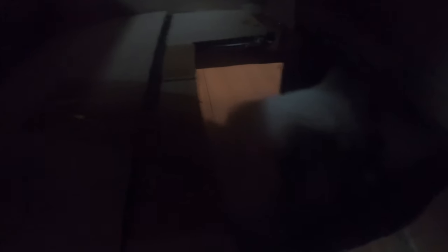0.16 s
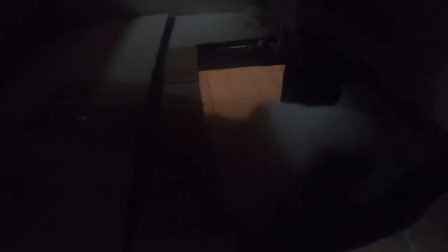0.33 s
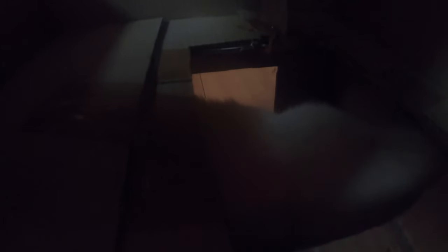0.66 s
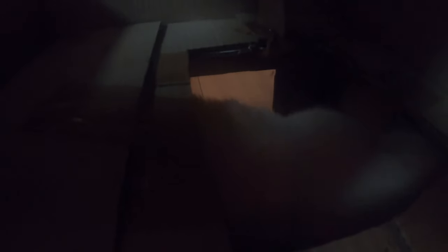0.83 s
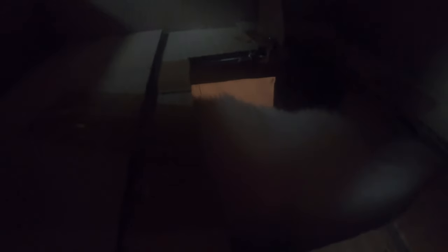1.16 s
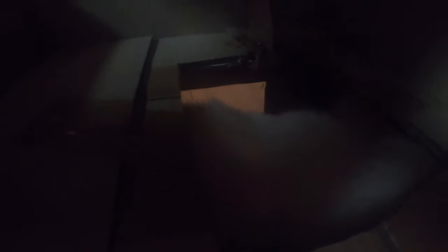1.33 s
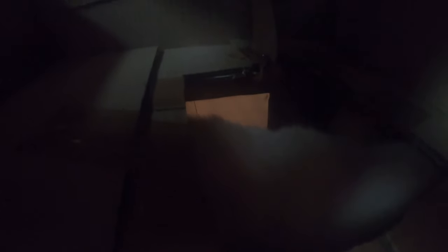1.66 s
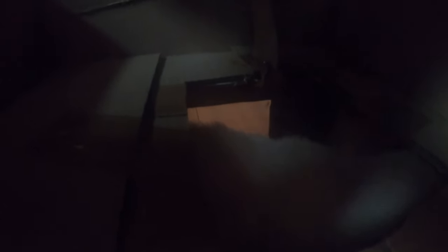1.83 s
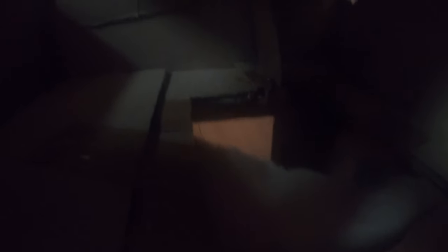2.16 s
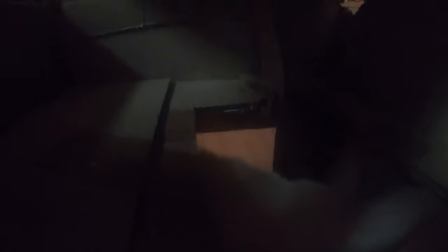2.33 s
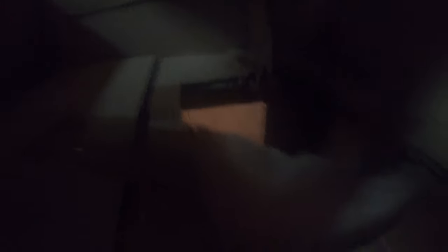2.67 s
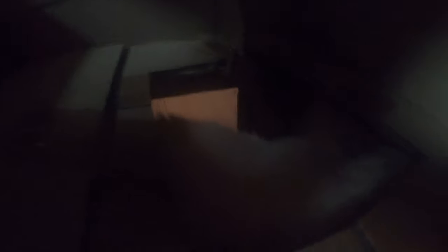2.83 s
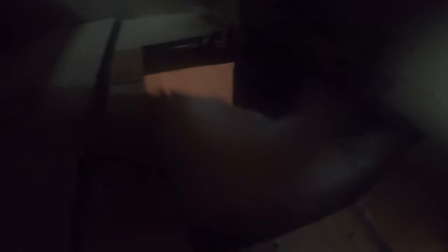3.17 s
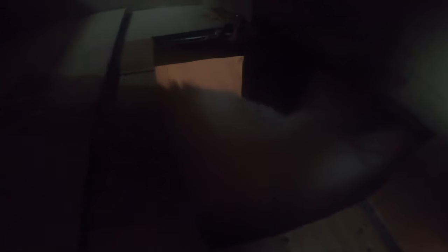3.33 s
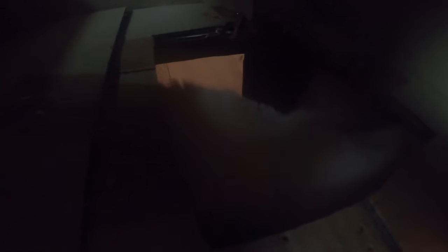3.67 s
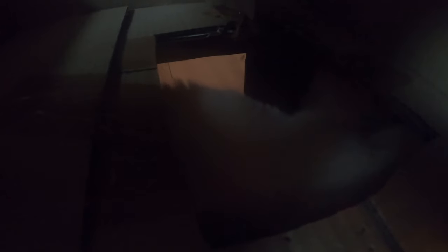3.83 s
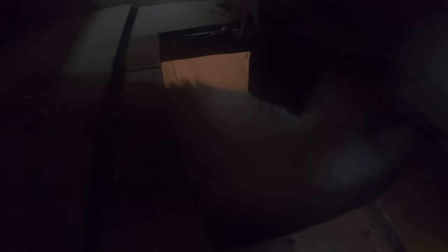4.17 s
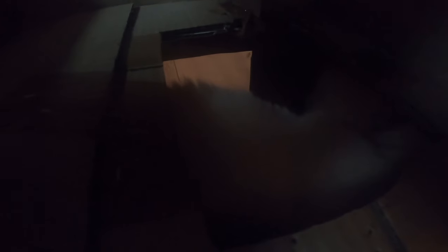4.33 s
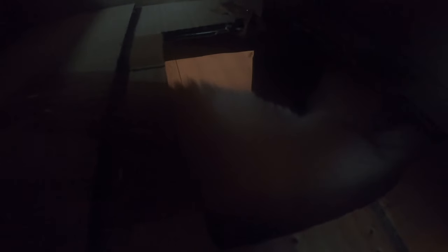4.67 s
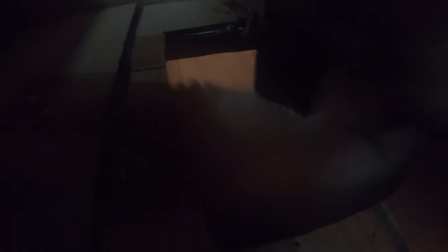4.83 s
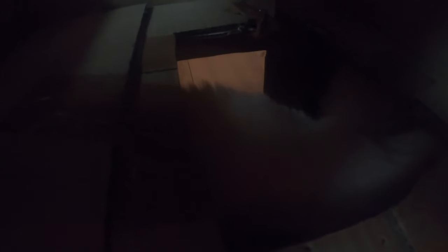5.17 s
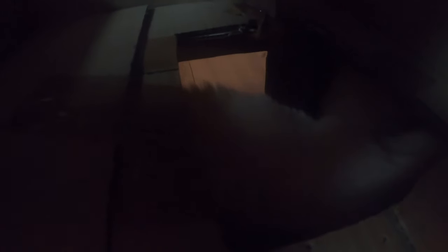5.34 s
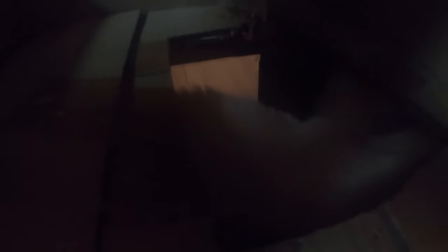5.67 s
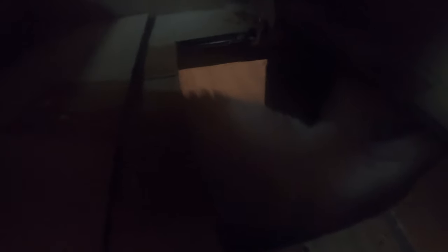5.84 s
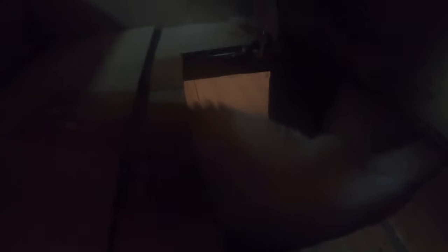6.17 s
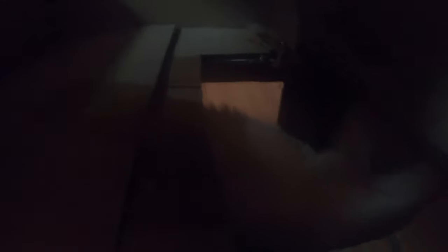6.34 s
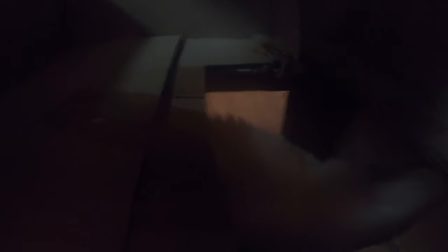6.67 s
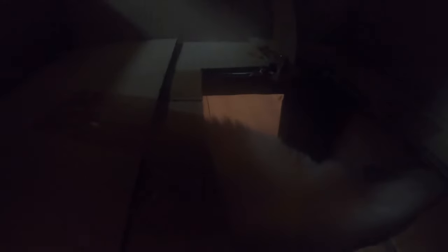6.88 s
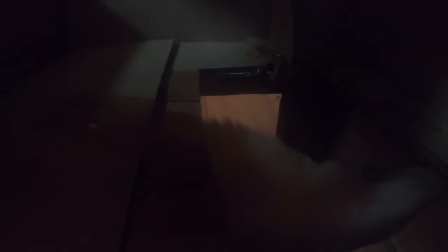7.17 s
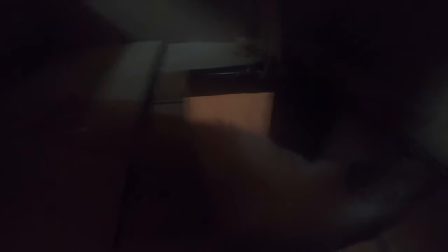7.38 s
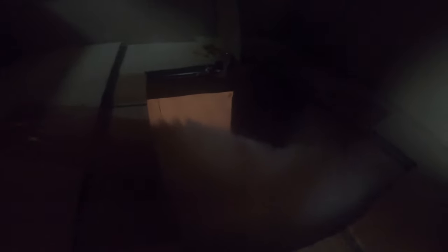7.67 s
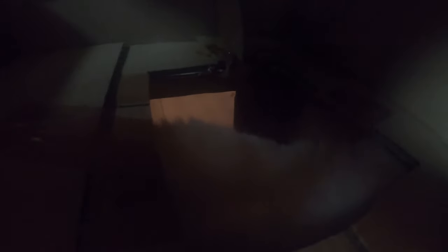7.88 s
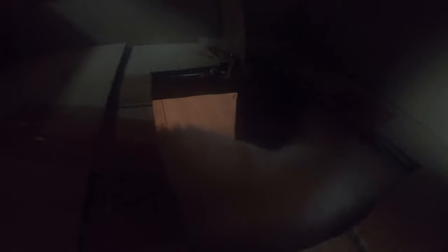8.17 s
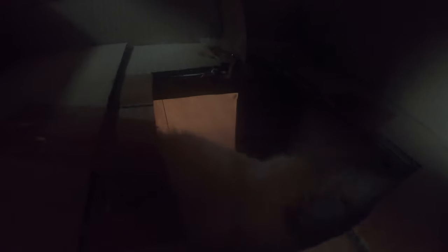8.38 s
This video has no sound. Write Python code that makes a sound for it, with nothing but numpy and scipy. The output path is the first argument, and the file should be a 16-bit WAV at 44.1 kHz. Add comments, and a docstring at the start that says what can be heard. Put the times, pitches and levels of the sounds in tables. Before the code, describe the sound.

A close stereo perspective on a cat shifting in a hollow cardboard box, in a quiet room with faint low background noise and very short echoes. A sharp claw tick at 0.15 s opens a run of brief paw scrapes, strongest around 0.4-0.7 s with a soft low bump. A dry flap-edge click comes near 1 s, then lighter scrapes and pad taps to 1.5 s. Sparse scratching follows, busier at 2.6-3.4 s, with gentle taps until 4.4 s. A stronger hollow scrape and low thud arrive at 4.7-5 s. From 5.3 s fur brushes the walls, with a short coarse flank shove at 5.6 s and a boomy bump at 6.2 s. A dull scuff and small clicks come at 6.7 s, then soft airy rubbing from 7.1 s, fuller at 7.4 s. At 8.16-8.35 s flaps crackle and knock rapidly around the loudest, deep boxy thump at 8.28 s, then it falls quiet.

```python
"""Cat in a cardboard box

A cat shifts about in a hollow box in a quiet room, close to a stereo microphone. Paws scrape by
stick-slip friction shaped by air resonances, fur hisses along the walls, and claws tick as dispersed
impulses. The flank shoves past, flap edges click, and weight excites dying modes of the box; at the
end the cat's weight lands and the flaps knock together. Echoes of box and room follow."""
import sys
import numpy as np
from scipy import signal
from scipy.fft import rfft, irfft, next_fast_len
from scipy.io import wavfile
from scipy.ndimage import uniform_filter1d

SR = 44100
rng = np.random.default_rng(int(sys.argv[2]) if len(sys.argv) > 2 else 0)


def dump(signal):
    """Clip the signal to [-1, 1] and save it as 16-bit WAV at the path in sys.argv[1]."""
    limited = np.clip(np.atleast_2d(signal).T, -1, 1)
    pcm = np.round(limited * 32767).astype(np.int16)
    wavfile.write(sys.argv[1], SR, pcm)


N = 375291
FILTER_LENGTH = 4096  # samples
FREQS = np.fft.rfftfreq(FILTER_LENGTH, 1 / SR)  # Hz
BAND_EDGE_HZ = 15000
QUIET_DB = -70.5
# A stroke gathers speed and slows: shares of its length, and the exponent of its speed.
ATTACK_SHARE, RELEASE_SHARE, SPEED_POWER = 0.43, 0.58, 0.9
# The cat is never quite still: coat against the card, and the wall under it, relative levels in dB.
RESTLESS_DB, RESTLESS_WALL_DB = -76, -82

# Levels and gains in the tables are relative: later stages may offset or normalize them.
# Paw drawn over the card inside the box: (start [s], length [s], level [dB], extra treble [dB],
# share ringing in the hollow [0-1], low wall drumming [dB], upper wall drumming [dB])
PAW_STROKES = [(0.079, 0.093, -59, 3.5, 0.75, -62, -58.5), (0.168, 0.14, -56.5, 3, 0.88, -62.5, -63.5),
               (0.374, 0.25, -54, -0.5, 0.69, -51, -70), (.46, 0.13, -50, 2, 0.79, -43.5, -54.5),
               (0.528, .16, -51, 1, 0.68, -59, -56), (0.698, .18, -57, -3, 0.97, -60, -76),
               (0.878, 0.23, -64.5, -3.5, 0.87, -58, -61.5), (1.246, .19, -59, -3, 0.53, -47.5, -57.5),
               (1.41, 0.12, -59.5, 6, 0.59, -68, -82), (1.489, 0.14, -61, -2.5, 0.36, -76, -87),
               (1.975, 0.14, -62.5, -2.5, 0.58, -57, -88), (2.1, 0.19, -63, -1, 0.42, -67, -75),
               (2.208, 0.14, -59, 4, 0.65, -63.5, -68.5), (2.602, 0.17, -55, 2, 0.6, -51.5, -71),
               (2.71, 0.19, -63, -0.5, 0.59, -62.5, -57), (2.838, 0.17, -60.5, -8, 0.25, -60.5, -60.5),
               (2.981, 0.2, -60.5, -4.5, .55, -51, -68), (3.122, 0.2, -61, -6, 0.57, -57.5, -70),
               (3.285, 0.092, -54.5, -1.5, 0.7, -67, -65.5), (3.34, 0.11, -64.5, -9, 0.44, -68, -84),
               (3.69, 0.49, -64, 2, 0.47, -60, -68), (3.97, 0.11, -56, -6.5, 0.81, -61, -52.5),
               (4.158, .13, -60, -8.5, 0.64, -63, -68), (4.632, 0.24, -59.5, -8, 0.95, -59.5, -75),
               (4.707, 0.17, -50.5, -11.5, 0.99, -60, -60.5), (4.856, 0.17, -46, -4.5, 0.82, -46, -53.5),
               (5.03, 0.17, -66, -14, 0.59, -89, -72.5)]
# Fur sliding along the wall: (start [s], length [s], level [dB], extra treble [dB],
# share ringing in the hollow [0-1], low wall drumming [dB], upper wall drumming [dB])
FUR_STROKES = [(1.598, 0.25, -74, -2, .3, -70.5, -82), (1.758, 0.22, -74, 5.5, .2, -86, -91),
               (3.348, 0.35, -72, -7, 0.48, -79, -82), (4.268, .33, -68.5, -33, .4, -76, -70.5),
               (5.346, .1, -55.5, -8, 0.96, -60.5, -65.5), (5.488, 0.32, -58.5, -3, 0.86, -49.5, -61),
               (5.658, 0.35, -57, -1, 0.88, -72, -77), (5.785, .06, -57.5, -9, 0.76, -66, -79),
               (5.92, 0.46, -59.5, -1.5, 0.78, -73, -83), (6.07, 0.18, -62.5, 4, 0.62, -78, -67.5),
               (6.2, 0.2, -58.5, 0, 0.95, -52.5, -64), (6.358, .32, -66, 1.5, 0.99, -62, -66.5),
               (7.072, .19, -65.5, 5.5, .05, -96, -96), (7.222, 0.43, -60.5, 7.5, .05, -83, -87),
               (7.401, 0.19, -51, -9, 0.91, -56, -51.5), (7.55, 0.31, -63.5, 4, 0.18, -92, -88),
               (7.742, .14, -54, -7, 0.31, -67, -59.5), (7.842, 0.35, -63, 2, 0.2, -75, -90),
               (8.002, 0.4, -61, 4, 0.26, -67, -58.5), (8.318, .12, -81, 9, .3, -75, -77.5)]
# Flank shoving along a wall: (start [s], length [s], level [dB], shudder [dB], left over right [dB])
FLANK_SHOVES = [(5.592, .124, -34, -34.5, -3.5)]
# Hind paw scuffing over the floor: (start [s], length [s], level [dB], shudder [dB], left over right [dB])
PAW_SCUFFS = [(6.694, .096, -46, -52, -2.5)]
# Paws and claws touching the card: (time [s], tick peak [dB], treble against the tick [dB], wall ring [dB])
TAPS = [(0.155, -20, -9, -53), (0.514, -32.5, -21, -38), (0.709, -40.5, -24, -39), (0.9, -43.5, -26, -46.5),
        (0.97, -44, -29, -62), (1.264, -35.5, -32, -45.5), (1.303, -35, -28, -50),
        (1.336, -40.5, -36, -44.5), (2.572, -44.5, -36, -60), (2.789, -43, -10.5, -55),
        (2.933, -45, -35, -74), (2.979, -49, -29, -46.5), (3.045, -47, -21.5, -40.5),
        (3.132, -48, -11, -45), (3.299, -38.5, -10, -57), (3.711, -42.5, -35, -52),
        (3.765, -45, -34, -56.5), (3.878, -64, -20, -44.5), (4.132, -46.5, -12, -54),
        (4.178, -46, -29, -53), (4.201, -40, -30, -54), (4.353, -49, -12, -53.5),
        (4.638, -50.5, -13, -51.5), (4.91, -35, -22, -39), (5.505, -49.5, -35, -57),
        (6.727, -37, -16, -40.5), (8.076, -58, -22, -55)]
# Flaps knocking together: (time [s], peak [dB], treble [dB], crackle decay [s])
KNOCKS = [(8.164, -31, 4, 0.0075), (8.185, -22.5, 4.5, 0.0086), (8.190, -24.5, 1, 0.0017),
          (8.206, -24.5, 0, 0.0044), (8.228, -20, 1, 0.0043), (8.232, -26.5, -4, 0.0026),
          (8.261, -31, 13, 0.0065), (8.276, -21, 13.5, 0.0049), (8.278, -14, -42, 0.0055),
          (8.313, -31.5, 0, 0.0034), (8.336, -51, 6, .005), (8.355, -49, 4, .003)]
# Flap dragging over its neighbour: (start [s], length [s], level [dB], shudder [dB])
FLAP_DRAGS = [(8.178, .105, -42, -31.5), (8.276, .095, -58, -57)]
# Free flap edge clicking outside the hollow: (time [s], peak [dB], treble [dB], crackle decay [s])
EDGE_CLICKS = [(.968, -38.5, -3, 0.0032), (.991, -45.5, -15, 0.0026), (1.024, -26, -4.5, 0.0039),
               (1.176, -38, 9.5, 0.004), (6.322, -47, 22, .006), (6.337, -43.5, 27, 0.0036),
               (6.698, -44, -5, 0.0022), (6.728, -43.5, 1, 0.0034), (6.772, -38, -15, 0.0036),
               (7.015, -57, 29, .002), (7.157, -46.5, 0, 0.0037)]
# Weight rocking the box: (time [s], build-up [s], sway peak [dB], floor panel peak [dB],
# pitch factor of the loaded panel [ratio], left over right [dB])
THUDS = [(.07, 0.026, -72, -77, 1.1, 0), (.53, 0.021, -47, -49, 1.1, -5), (.64, 0.014, -45, -68, 1.8, -8),
         (1.369, 0.034, -48, -67, 1.5, -4), (2.1, 0.019, -57, -65, 1.05, -7),
         (3.05, 0.045, -48, -50, 0.83, -4), (3.738, 0.014, -58, -79, 0.86, -3),
         (3.83, 0.019, -62, -54, 0.87, 0), (4.93, 0.061, -35, -37.5, 0.89, 2.5),
         (5.381, 0.028, -64, -59, 1.08, 0), (5.599, 0.025, -33, -37, 1.04, -15),
         (5.681, 0.0056, -43, -33.5, 1.5, -1), (6.18, 0.029, -33.5, -28, 1.21, -0.5),
         (6.234, 0.022, -40, -36.5, 0.9, 0), (7.87, .03, -57, -63.5, 0.84, -1),
         (8.07, .03, -58, -64, 0.82, 0), (8.188, 0.032, -41, -28, 1.306, -7),
         (8.278, 0.008, -18, -13.5, 1.05, -2)]

# Colour of the pads before the resonances of the box: (frequency [Hz], gain [dB])
PAD_COLOUR = [(150, -10), (500, -2.5), (1000, 0.5), (1750, -0.5), (3000, 0.5), (4000, -4), (5500, -11),
              (7500, -15.5), (9000, -15), (10400, -37), (11500, -40), (14000, -60)]
# Colour of the fur stirred by a paw stroke: (frequency [Hz], gain [dB])
FUR_COLOUR = [(150, -2.5), (500, 2), (1000, 3.5), (1750, 7), (3000, -3), (4200, -8), (5500, -14),
              (7500, -12), (9000, -17.5), (10300, -17.5), (11500, -31), (14000, -44)]
# Colour of the coat sliding along the wall: (frequency [Hz], gain [dB])
COAT_COLOUR = [(150, -9), (500, -1.5), (1000, 5.5), (1750, 2.5), (3000, -1), (4200, -6), (5500, -9),
               (7500, -10.5), (9000, -17.5), (10300, -15), (11500, -32), (14000, -40)]
# Colour of the flank's rasp: (frequency [Hz], gain [dB])
FLANK_COLOUR = [(150, -9), (500, -4), (750, 6), (950, 4.5), (1250, 10), (1650, 6), (2300, -10.5),
                (3100, -1.5), (3600, -11), (4200, -16), (4900, -9), (5700, -11.5), (7050, -6.5),
                (8500, -22), (10400, -22.5), (11500, -42), (14000, -40)]
# Colour of the shudder under dragged card: (frequency [Hz], gain [dB])
SHUDDER_COLOUR = [(18, -8), (30, 1.5), (135, -2.5), (190, -11), (235, -9.5), (290, -10), (380, -10),
                  (467, -27), (523, -30), (600, -20), (780, -56), (1320, -120)]
# Colour of the hind paw's scuff: (frequency [Hz], gain [dB])
SCUFF_COLOUR = [(150, -1), (320, 7.5), (520, 10), (900, 6), (1400, 2), (2200, 0), (3000, -16), (5000, -15),
                (7200, -10.5), (9000, -24), (10400, -26), (14000, -65)]
# Colour of a claw or pad tick: (frequency [Hz], gain [dB])
TICK_COLOUR = [(200, -19), (500, 1.5), (800, 5.5), (1200, 7), (1900, 0), (2450, 3.5), (3050, 5.5),
               (4000, -6.5), (5500, -10.5), (7500, -11), (9000, -15), (11000, -40), (14000, -50)]
# Colour of a flap knock: (frequency [Hz], gain [dB])
KNOCK_COLOUR = [(100, 1.5), (190, 1.5), (240, 14), (310, 4), (390, 3), (520, -6.5), (1000, -7), (1600, -9),
                (3200, -8.5), (4300, -18.5), (6500, -20.5), (9000, -28), (10500, -31), (11700, -43),
                (14000, -47)]
# Colour of a flap-edge click: (frequency [Hz], gain [dB])
CLICK_COLOUR = [(150, -14), (400, 1), (620, -7), (820, -11), (1200, 3), (1900, -6), (3000, 0), (4000, -13),
                (6000, -13.5), (9000, -22), (11000, -38), (14000, -62)]
# Rumble of the whole box giving under a stroke: (frequency [Hz], gain [dB])
RUMBLE_COLOUR = [(12, -9.5), (28, 4), (48, -3.5), (80, -9.5), (120, -24), (250, -52.5)]
# Colour of the quiet background: (frequency [Hz], gain [dB])
QUIET_COLOUR = [(12, -48), (20, 1.5), (48, -5.5), (92, -22.5), (168, 5), (495, -18), (709, -5), (1020, -16),
                (2600, -24.5), (8540, -33), (10100, -34), (11900, -47), (14800, -68)]

# Air resonances between the walls: (frequency [Hz], width [Hz], left height [dB], right height [dB])
CAVITY_MODES = [(680, 170, 13, 14), (1276, 146, 9, 7), (1275, 424, 15.5, 16.5), (2090, 540, 2, 3),
                (2495, 620, -3.5, 8.5), (3790, 570, 1.5, 5), (4690, 590, 3.5, 15), (5980, 600, 14, 8),
                (6680, 1160, -11.5, 17), (8390, 790, -5, 17.5), (9900, 600, 12, -4)]
# Resonances of the flaps: (frequency [Hz], width [Hz], left height [dB], right height [dB])
FLAP_MODES = [(380, 114, 7, 2.5), (600, 130, 3.5, 7), (1020, 180, 1.5, 5), (1240, 230, 1, 3),
              (2340, 180, 6, 8), (2600, 330, -1, 12), (2970, 300, 5.5, 1), (3810, 340, 9, 10),
              (5170, 500, 4, 3), (7850, 370, 2, -9), (10100, 500, 10, -9)]
# Modes of the floor panel: (frequency [Hz], T60 [s], level [dB])
PANEL_MODES = [(107.5, 0.086, 10.5), (228.5, 0.1, -9), (302, 0.12, -10), (372, .08, 3)]
# Sway of the whole box: (frequency [Hz], T60 [s])
SWAY_MODE = (45.5, 0.25)
# Low modes of the side wall: (frequency [Hz], T60 [s], level [dB])
WALL_LOW_MODES = [(154, 0.17, 0.5), (168.3, 0.15, -5.5), (200, 0.099, -9)]
# Upper modes of the side wall: (frequency [Hz], T60 [s], level [dB])
WALL_HIGH_MODES = [(223, 0.075, 1), (257, 0.048, 3), (301.8, 0.069, 0.5), (360, 0.026, -20.5)]

# Sound from inside meets the ports from opposite sides of a wall: (frequency [Hz], left lead [rad])
INSIDE_PHASE = [(100, 3), (1300, 3), (2000, 2), (2500, 1), (3000, 1), (4800, 1.1), (5600, -0.1),
                (6500, -2.5), (8500, -3), (14000, -2)]
# Rubbing on the wall itself, its bass reaching the ports nearly in step: (frequency [Hz], left lead [rad])
WALL_PHASE = [(300, 7), (420, 3.5), (600, 4), (1250, 3), (1650, 2), (2200, 1.65), (3000, 0.6), (4500, 0.5),
              (6000, -2.3), (7200, -3), (14000, -5.5)]
# Sound from the flaps: (frequency [Hz], left lead [rad])
FLAP_PHASE = [(100, 0.44), (500, .1), (1100, 1.4), (1600, 1.2), (2500, 1.16), (3800, 0.39), (6000, 1.5),
              (14000, 1.8)]
# Decay of the room: (frequency [Hz], T60 [s])
ROOM_DECAY = [(100, 0.35), (500, 0.069), (2500, 0.17), (10000, 0.21)]


def gain_of(db):
    """Logarithmic level: decibels to amplitude."""
    return 10 ** (np.asarray(db) / 20)


def evened(x):
    """Power normalization: scales to rms 1."""
    return x / np.sqrt(np.mean(x ** 2) + 1e-20)


def read(points, hz=FREQS):
    """Interpolation: joins (Hz, value) points by straight lines over log frequency."""
    f, value = np.transpose(points)
    return np.interp(np.log(hz + 1), np.log(f + 1), value)


def add(mix, s, sound):
    """Superposition: adds a sound to the mix from time s."""
    part = mix[..., max(round(s * SR), 0):][..., :sound.shape[-1]]
    part += sound[..., :part.shape[-1]]


def colour(x, db):
    """Minimum-phase filtering: the phase follows from the log gain; the peak gain is 0 dB."""
    log_gain = np.log(gain_of(np.maximum(db - db.max(), -100)))
    circle = np.concatenate([log_gain, log_gain[-2:0:-1]])
    response = np.fft.ifft(np.exp(np.conj(signal.hilbert(circle)))).real
    return signal.oaconvolve(x, response)[:len(x)]


def heard(x, port_db):
    """Two-path filtering: one sound coloured for each port, with its full gain."""
    return np.array([colour(x, db) * gain_of(db.max()) for db in port_db])


def noise_pair(size, points, apart):
    """Partial coherence: the ports share one coloured noise and add one each of their own."""
    shared, left, right = (colour(rng.standard_normal(size), read(points)) for _ in range(3))
    return evened(shared + apart * np.array([left, right]))


def treble(corner_hz=4000):
    """Shelving: a weight from 0 in the bass to 1 in the treble."""
    return FREQS ** 4 / (FREQS ** 4 + corner_hz ** 4)


def resonance_db(modes):
    """Resonance: humps in dB for the left and right port, each width taken at half its dB height."""
    return sum(np.outer(db, 2 ** -((2 * (FREQS - hz) / width) ** 2)) for hz, width, *db in modes)


def ring(hz, t60, t):
    """Damped oscillation: one mode falling by 60 dB in t60."""
    return np.sin(2 * np.pi * hz * t) * np.exp(-np.log(1000) * t / t60)


def pan(x, side_db):
    """Level difference: raises the left over the right by side_db."""
    return x * gain_of(np.array([[side_db], [-side_db]]) / 2)


def ports(x, phase):
    """Phase difference: a near source reaches the two microphone ports out of step."""
    size = next_fast_len(N + FILTER_LENGTH)
    lag = np.exp(-1j * read(phase, np.fft.rfftfreq(size, 1 / SR)))
    return np.array([x[0], irfft(rfft(x[1], size) * lag, size)[:N]])


def reflections(x, t60s, delay_s):
    """Reverberation: sparse echoes of random sign, unlike at each port, each band with its own decay."""
    echoes = rng.choice([-1., 1.], (2, SR // 2)) * (rng.random((2, SR // 2)) < 1 / 10)
    hz, t, z = signal.stft(echoes, SR, nperseg=128)
    decay = gain_of(-60 * t / read(t60s, hz)[:, None])
    tail = signal.istft(z * decay, SR, nperseg=128)[1]
    tail *= np.arange(tail.shape[1]) > delay_s * SR
    tail = tail / np.linalg.norm(tail, axis=1, keepdims=True)
    return signal.oaconvolve(x, tail, axes=1)[:, :N]


def friction(slips_per_s, spread_db, smooth, judder_db, size=N):
    """Stick-slip friction: countless hairs hiss, larger fibres catch and slip, and the pressure judders."""
    hiss, sign, wobble = rng.standard_normal((3, size))
    slip_size = gain_of(spread_db * np.minimum(rng.exponential(1, size), 4))
    slips = sign * slip_size * (rng.random(size) < slips_per_s / SR)
    pressure = evened(uniform_filter1d(uniform_filter1d(wobble, size=500), size=300))
    share = np.clip(smooth, 0, 1)
    contact = np.sqrt(share) * hiss + np.sqrt(1 - share) * evened(slips)
    return evened(contact * gain_of(judder_db * pressure))


def patch(port_db, slips_per_s, spread_db, smooth, judder_db, size=N, apart=0.31, treble_apart=1.0):
    """Extended source: the higher the pitch, the less alike the two ports hear a patch of contact."""
    shared, *own = (friction(slips_per_s, spread_db, smooth, judder_db, size) for _ in range(3))
    unlike_db = 20 * np.log10(abs(apart + treble_apart * treble()) + 1e-6)
    pair = []
    for x, db in zip(own, port_db):
        own_db = db + unlike_db
        pair.append(colour(shared, db) + colour(x, own_db) * gain_of(own_db.max() - db.max()))
    return evened(np.array(pair) * gain_of(port_db.max(1))[:, None])


def wander(x, patchy_db, patch_hz=700, patch_s=.06):
    """Moving contact: as the point travels over the card, the colour of the rubbing keeps shifting."""
    z = signal.stft(x, nperseg=512)[2]
    field = rng.standard_normal(z.shape[1:])
    bins, frames = max(round(patch_hz * 512 / SR), 1), max(round(patch_s * SR / 256), 1)
    for _ in range(2):
        field = uniform_filter1d(uniform_filter1d(field, bins, 0), frames, 1)
    return evened(signal.istft(z * gain_of(patchy_db * evened(field)), nperseg=512)[1][:, :N])


def swells(strokes, gains):
    """Addition of power: the strength at every sample of strokes that gather speed and slow."""
    power = np.zeros(N)
    for (s, length, *_), gain in zip(strokes, gains):
        u = np.linspace(0, 1, round(length * SR))
        ramp = np.clip(np.minimum(u / ATTACK_SHARE, (1 - u) / RELEASE_SHARE), 0, 1)
        speed = np.sin(np.pi / 2 * ramp)
        add(power, s, (gain * speed ** SPEED_POWER) ** 2)
    return np.sqrt(power)


def stroked(texture, strokes, share=1, corner_hz=4500):
    """Amplitude modulation: strokes shape a friction texture, each with its own level of treble."""
    level_db, treble_db = np.transpose(strokes)[2:4]
    high_pass = signal.butter(2, corner_hz, "high", fs=SR, output="sos")
    top = signal.sosfiltfilt(high_pass, texture)
    body = (texture - top) * swells(strokes, share * gain_of(level_db))
    return body + top * swells(strokes, share * gain_of(level_db + treble_db))


def drumming(column, paw_db, coat_db, restless_db):
    """Forced vibration: how hard the strokes of paws and coat shake the side wall at every sample."""
    paws = swells(PAW_STROKES, gain_of(np.array(PAW_STROKES)[:, column] + paw_db))
    coat = swells(FUR_STROKES, gain_of(np.array(FUR_STROKES)[:, column] + coat_db))
    return np.sqrt(paws ** 2 + coat ** 2 + gain_of(RESTLESS_WALL_DB + restless_db) ** 2)


def snap(port_db, lag_s, crumple, crumple_s):
    """Dispersion: bending waves bring the treble first, and crushed fibres crackle; the peak is 1."""
    t = np.arange(FILTER_LENGTH) / SR
    bend = irfft(np.exp(-4j * np.pi * lag_s * np.sqrt(1000 * FREQS)))  # lag_s is the delay at 1 kHz
    fibres = rng.standard_normal(FILTER_LENGTH) * np.exp(-t / crumple_s)
    sound = heard(bend + crumple * fibres / np.linalg.norm(fibres), port_db)
    return sound / abs(sound).max()


def drag(s, length, level_db, shudder_db, port_db, fade=.7):
    """Coarse friction: a scrape of dragged card and the shudder of the box, returned apart."""
    count = round(length * SR)
    rasp = patch(port_db, slips_per_s=900, spread_db=1.0, smooth=0.6, judder_db=0.8, size=count)
    shudder = noise_pair(count, SHUDDER_COLOUR, apart=.5)
    window, out = signal.windows.tukey(count, fade), np.zeros((2, 2, N))
    add(out, s, np.array([gain_of(level_db) * rasp, gain_of(shudder_db) * shudder]) * window)
    return out


def quiet():
    """Stationary noise: the still room and the microphone's own hiss."""
    return gain_of(QUIET_DB) * noise_pair(N, QUIET_COLOUR, apart=1.0)


def brushing(level_db=1.0, deep_db=1, deep_hollow=0.55):
    """Fine friction: the coat strokes the wall, sounds the hollow in part, and stirs faintly throughout."""
    hollow = np.clip(np.array(FUR_STROKES)[:, 4], 0, 1)
    coat = patch(np.array([read(COAT_COLOUR)] * 2), slips_per_s=2500, spread_db=3.5, smooth=0.84,
                 judder_db=1.4)
    coat = wander(coat, patchy_db=2)
    deep = patch(read(COAT_COLOUR) + deep_hollow * resonance_db(CAVITY_MODES), slips_per_s=1400,
                 spread_db=4.5, smooth=0.51, judder_db=1)
    deep = wander(deep, patchy_db=4.5)
    soft_strokes = gain_of(level_db) * stroked(coat, FUR_STROKES, np.sqrt(1 - hollow ** 2))
    deep_strokes = gain_of(deep_db) * stroked(deep, FUR_STROKES, hollow)
    return soft_strokes + deep_strokes + gain_of(RESTLESS_DB) * coat


def wall(step_db=5, step_high_db=-12, left_db=-4, right_db=5, high_side_db=-3, claw_db=-23):
    """Modal vibration: the side wall drums under rubbing and rings at steps, its low modes in antiphase."""
    t = np.arange(SR // 3) / SR
    low_shaking = drumming(-2, paw_db=0.0, coat_db=0, restless_db=2.0)
    high_shaking = drumming(-1, paw_db=-1, coat_db=-2.0, restless_db=-8.5)
    groups = [(WALL_LOW_MODES, low_shaking, step_db),
              (WALL_HIGH_MODES, high_shaking, step_db + step_high_db)]
    rings = []
    for modes, strength, blow_db in groups:
        body = sum(gain_of(db) * ring(hz, t60, t) for hz, t60, db in modes)
        body = body * (1 - np.exp(-t / 0.0042))  # soft onset
        drive = friction(slips_per_s=300, spread_db=3.5, smooth=0.67, judder_db=0.7)
        sound = strength * evened(signal.oaconvolve(np.diff(drive, prepend=0), body)[:N])
        for s, tick_db, _, ring_db in TAPS:
            peak_db = max(ring_db + blow_db, tick_db + claw_db)
            add(sound, s, gain_of(peak_db) * body / abs(body).max())
        rings.append(sound)
    low, high = rings
    return np.array([-gain_of(left_db) * low, gain_of(right_db) * low]) + pan(high, high_side_db)


def rumbling():
    """Shared excitation: the push that shakes the wall also makes the whole box give."""
    strength = drumming(-2, paw_db=-15, coat_db=-13.0, restless_db=-3.0)
    return strength * noise_pair(N, RUMBLE_COLOUR, apart=0.23)


def thuds(softness=0.57, lag_s=0.00047):
    """Impact duration: settling weight swells the low modes, and a slow push spares the overtones."""
    t, out = np.arange(SR // 2) / SR, np.zeros((2, N))
    for s, rise, sway_db, panel_db, pitch, side_db in THUDS:
        swell = np.sin(np.pi / 2 * np.minimum(t / rise, 1)) ** 4
        sway = swell * ring(*SWAY_MODE, t)
        panel = swell * sum(gain_of(db) * np.exp(-softness * hz * rise) * ring(hz * pitch, t60, t)
                            for hz, t60, db in PANEL_MODES)
        sway = gain_of(sway_db) * sway / abs(sway).max()
        panel = gain_of(panel_db) * panel / abs(panel).max()
        left, right = pan(sway + panel, side_db)
        add(out[0], s, left)
        add(out[1], s + lag_s, right)
    return out


def rubbing(paw_db=5, fur_db=2, fur_hollow=0.16):
    """Cavity resonance: pads scrape deep in the box; fur at the open top hisses more evenly."""
    hollow = np.clip(np.array(PAW_STROKES)[:, 4], 0, 1)
    cavity = resonance_db(CAVITY_MODES)
    pads = patch(read(PAD_COLOUR) + cavity, slips_per_s=900, spread_db=4.5, smooth=0.55, judder_db=3.0)
    pads = wander(pads, patchy_db=3.5)
    fur = patch(read(FUR_COLOUR) + fur_hollow * cavity, slips_per_s=1000, spread_db=2.5, smooth=0.77,
                judder_db=-0.3)
    fur = wander(fur, patchy_db=4.0)
    pad_strokes = gain_of(paw_db) * stroked(pads, PAW_STROKES, hollow)
    return pad_strokes + gain_of(fur_db) * stroked(fur, PAW_STROKES, np.sqrt(1 - hollow ** 2))


def catches(per_s=45, level_db=2, spread_db=5.0, hollow=0.92, treble_db=-10, vary_db=6, count=8):
    """Random impulses: drawn claws catch on ribs of the card, each spot with its own colour and depth."""
    size = gain_of(spread_db * np.minimum(rng.exponential(1, N), 2)) * (rng.random(N) < per_s / SR)
    spot, out = rng.integers(0, count, N), np.zeros((2, N))
    pull = swells(PAW_STROKES, gain_of(np.array(PAW_STROKES)[:, 2] + level_db))
    for k, (depth, bright) in enumerate(rng.random((count, 2))):
        shade = read(CLICK_COLOUR) + hollow * depth * resonance_db(CAVITY_MODES)
        shade = shade + (treble_db + vary_db * 2 * bright) * treble(corner_hz=1500)
        tick = snap(shade, lag_s=0.002017, crumple=0.47, crumple_s=0.004)
        hits = size * pull * (spot == k)
        out += signal.oaconvolve(hits[None], tick, axes=1)[:, :N]
    return out


def taps(level_db=3, plain_treble_db=-13, hollow=0.75, soft_below_db=-33):
    """Contact hardness: claws tick sharply against the card; the softer pads scuff."""
    out = np.zeros((2, N))
    for s, db, treble_db, _ in TAPS:
        tilt_db = np.clip(treble_db - plain_treble_db, -14, 10)
        shade = read(TICK_COLOUR) + hollow * resonance_db(CAVITY_MODES) + tilt_db * treble()
        if db > soft_below_db:
            tick = snap(shade, lag_s=0.0016, crumple=0.98, crumple_s=0.002)
        else:
            tick = snap(shade, lag_s=0.001957, crumple=0.82, crumple_s=0.0078)
        add(out, s - .001, gain_of(db + level_db) * tick)
    return out


def clicks(room_db=-13):
    """Free radiation: a flap's edge clicks with no hollow ring, thrown back by what stands near."""
    out = np.zeros((2, N))
    for s, db, treble_db, crackle_s in EDGE_CLICKS:
        shade = np.array([read(CLICK_COLOUR) + treble_db * treble()] * 2)
        click = snap(shade, lag_s=0.00116, crumple=1.0, crumple_s=crackle_s)
        add(out, s - .001, gain_of(db) * click)
    echoes = reflections(out, [(300, 0.15), (2000, 0.18), (8000, 0.17)], delay_s=0.0036)
    return out + gain_of(room_db) * echoes


def shoves(hollow=0.2, treble_side_db=-7, scuff_hollow=.35):
    """Heavy friction: flank on the right wall and a dull hind-paw scuff, rasp and shudder apart."""
    cavity = resonance_db(CAVITY_MODES)
    side_tilt = np.outer([1, -1], treble_side_db / 2 * treble())
    flank = read(FLANK_COLOUR) + hollow * cavity + side_tilt
    paw = read(SCUFF_COLOUR) + scuff_hollow * cavity
    flank_sound = sum(pan(drag(*row, flank, fade=.85), side_db) for *row, side_db in FLANK_SHOVES)
    paw_sound = sum(pan(drag(*row, paw, fade=0.55), side_db) for *row, side_db in PAW_SCUFFS)
    return flank_sound + paw_sound


def knocks():
    """Plate impact: flaps drag over and slap against each other, coloured by their resonances."""
    shade = read(KNOCK_COLOUR) + resonance_db(FLAP_MODES)
    out = sum(drag(*row, shade, fade=0.42).sum(0) for row in FLAP_DRAGS)
    for s, db, treble_db, crackle_s in KNOCKS:
        knock = snap(shade + treble_db * treble(), lag_s=0.00204, crumple=1.9, crumple_s=crackle_s)
        add(out, s - .001, gain_of(db) * knock)
    return out


def scene(scatter_db=-11, room_db=-19):
    """Superposition: all the cat's sounds, scattered by the flaps and faintly returned by the room."""
    rasp, shudder = shoves()
    near = ports(rubbing() + catches() + taps(), INSIDE_PHASE)
    near = near + ports(brushing() + rasp, WALL_PHASE)
    near = near + ports(knocks(), FLAP_PHASE) + clicks()
    scattered = reflections(near, [(300, 0.037), (8000, 0.014)], delay_s=0.0012)
    near = near + gain_of(scatter_db) * scattered
    near = near + shudder + wall() + rumbling() + thuds()  # these bypass the scattering
    return near + gain_of(room_db) * reflections(near, ROOM_DECAY, delay_s=0.0061) + quiet()


def record(dry):
    """Band limitation: a linear-phase low-pass at the recorder's upper edge."""
    low_pass = signal.firwin(511, BAND_EDGE_HZ, window=("kaiser", 9), fs=SR)
    return signal.oaconvolve(dry, low_pass[None], "same")


dry = scene()
out = record(dry)
dump(out)
```